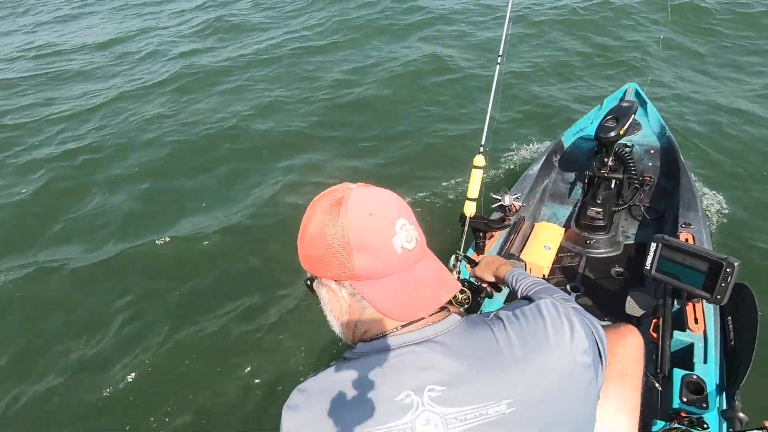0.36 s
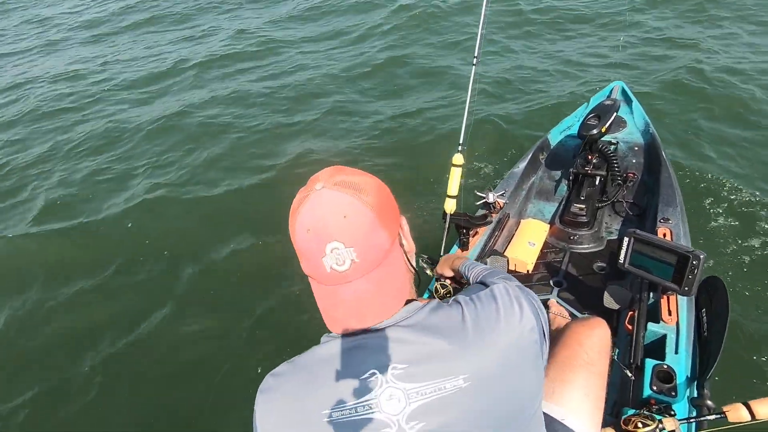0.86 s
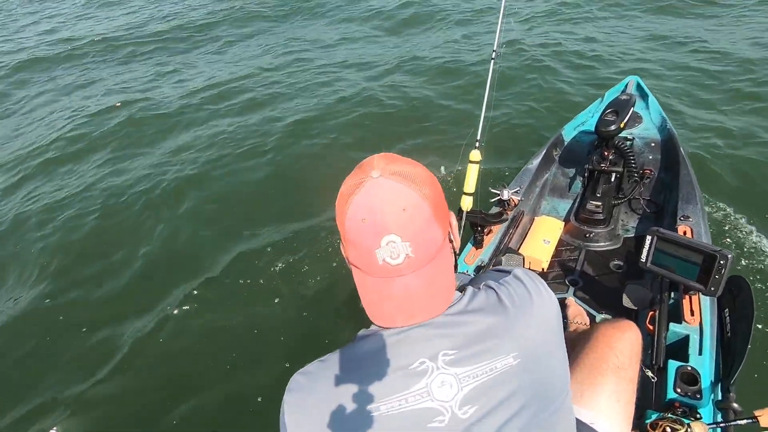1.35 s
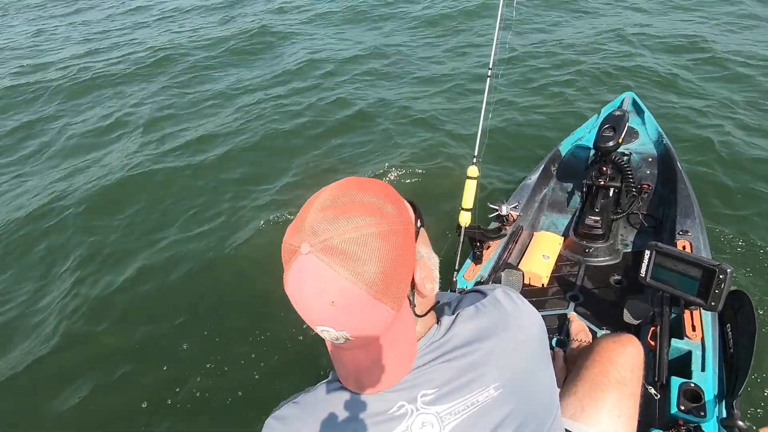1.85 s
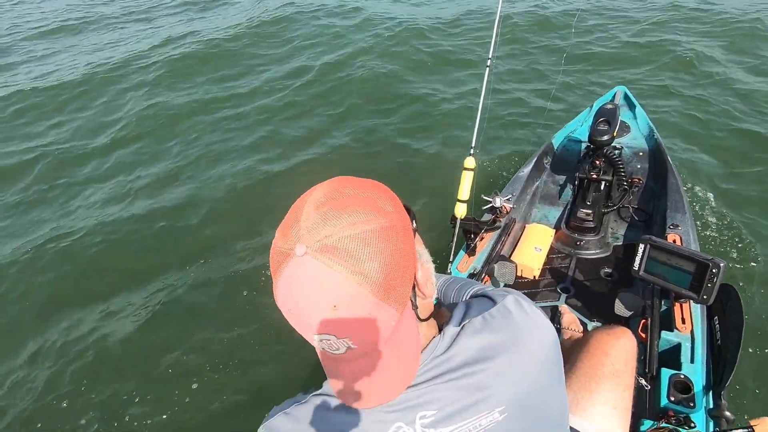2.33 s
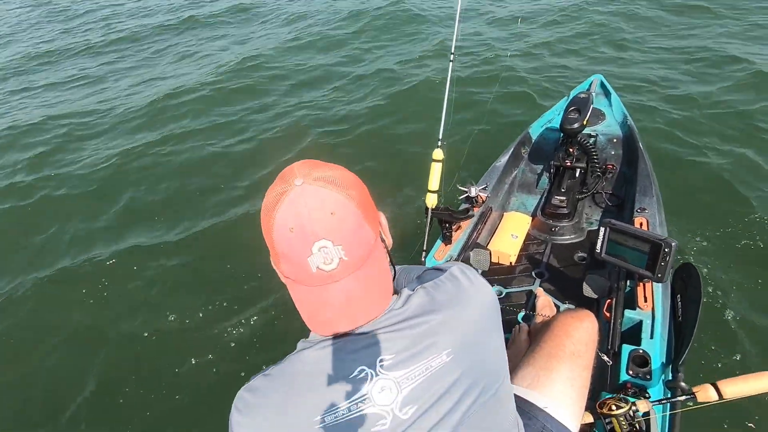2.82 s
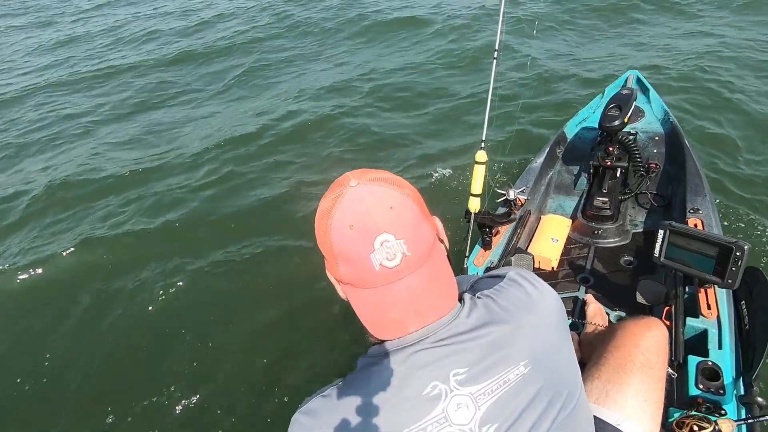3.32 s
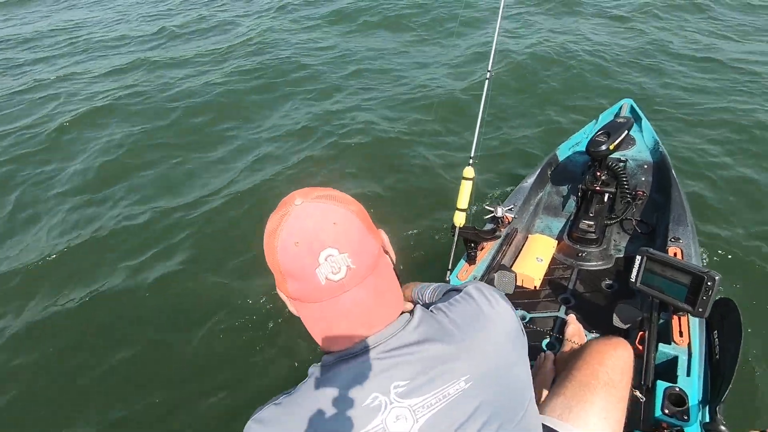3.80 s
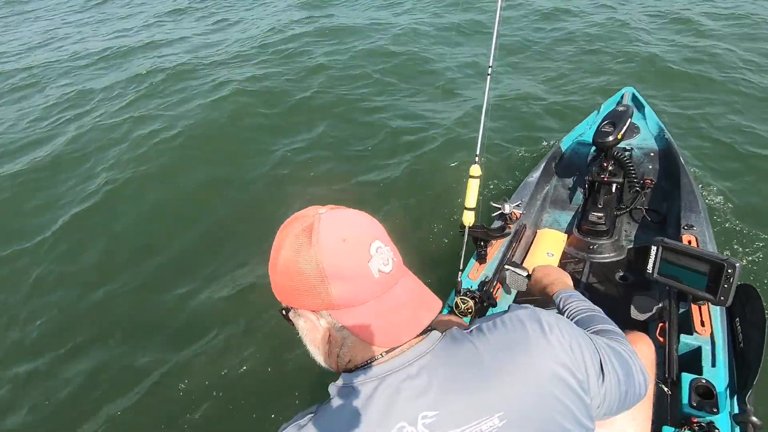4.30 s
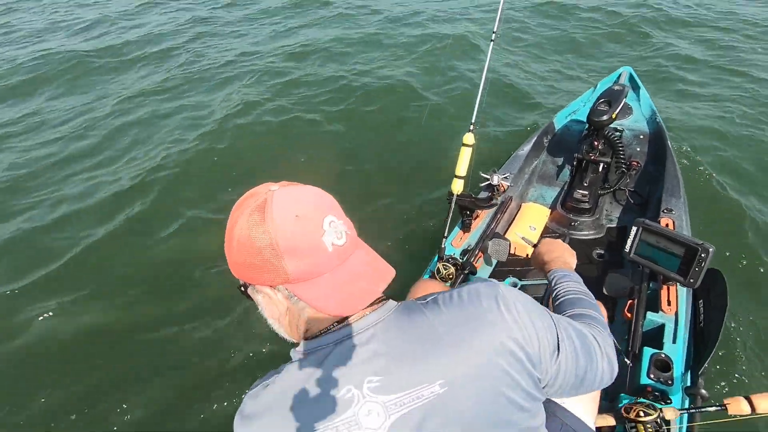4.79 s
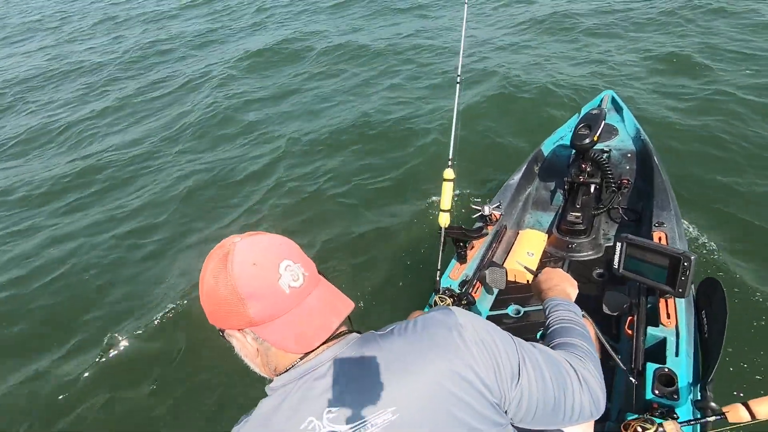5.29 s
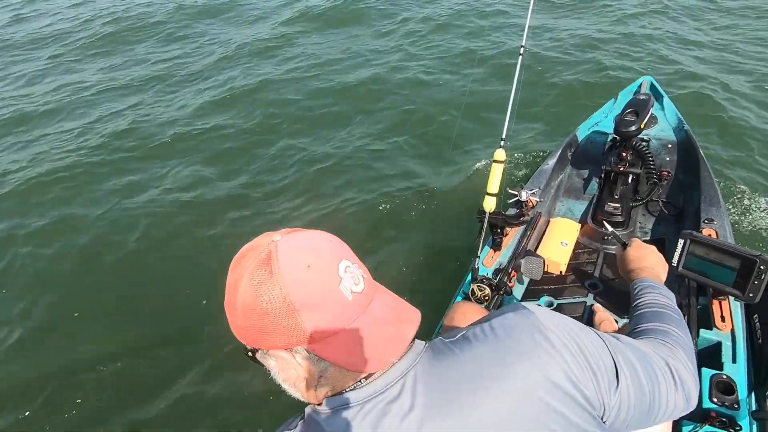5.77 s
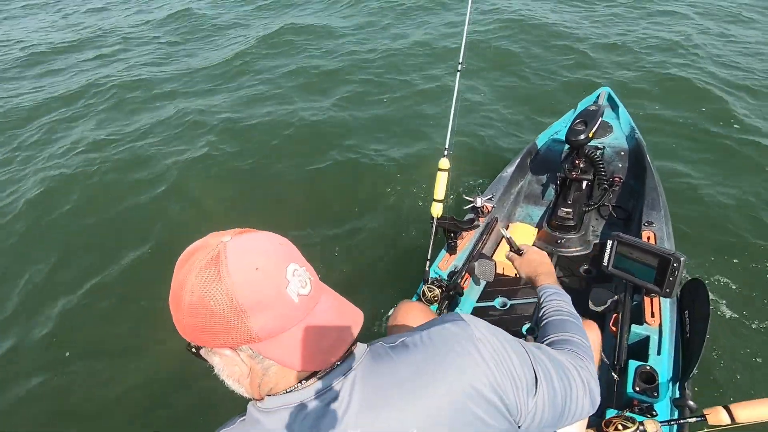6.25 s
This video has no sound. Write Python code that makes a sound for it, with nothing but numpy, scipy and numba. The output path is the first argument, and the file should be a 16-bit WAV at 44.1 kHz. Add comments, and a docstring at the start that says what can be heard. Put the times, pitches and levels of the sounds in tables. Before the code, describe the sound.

Close, bass-heavy two-channel sound from a kayak, with the low end stronger on the right. Soft wash and faint hiss continue under irregular hollow slaps, rising bubble plops, short gulps of air and dull panel thumps. Tiny droplets tick on the deck. A quieter lull sits in the middle, then more slaps and foam fizz, one light knock, and two booming slaps near the end.

```python
"""On the water in a plastic kayak, heard by a two-port camera microphone on a pole fixed to the boat.
From the start filtered noise gives wind, hull rumble and hiss, summed cosines a far engine, and beds of
tiny rings in noise the wash. Within half a second bubbles plop, air gulps and waves slap, some short and
dry (hull and pole carry the treble first); panels thump as low tones, droplets tick as noise bursts.
From about 3 s foam fizzes in slower bursts; gear knocks near 5 s; past 6 s two heavy waves boom in the hull."""
import sys
import numpy as np
from scipy import signal
from scipy.fft import rfft, irfft
from scipy.io import wavfile
from scipy.ndimage import uniform_filter1d
from numba import njit

SR = 44100
rng = np.random.default_rng(int(sys.argv[2]) if len(sys.argv) > 2 else 0)


def wav_record(signal):
    """Record a signal, one row per channel, as 16-bit PCM in the file named by sys.argv[1]."""
    frames = np.transpose(np.atleast_2d(signal))
    bounded = np.clip(frames, -1, 1)
    # unit amplitude maps onto the largest positive 16-bit level
    quanta = np.round(bounded * 32767).astype(np.int16)
    wavfile.write(sys.argv[1], SR, quanta)


def field_ratio(decibels):
    """Amplitude ratio for a level in dB (20 dB per decade); scalars and array-likes work."""
    return 10 ** (np.asarray(decibels, dtype=float) / 20)


N = 292383
T = np.arange(N) / SR
HZ = np.arange(N // 2 + 1) * SR / N + 1e-3  # kept above zero for logs and ratios

# Water colour at the two ports: f/Hz, left gain/dB, right gain/dB, left phase lead/rad
PORT_COLOUR = [(180, -3.5, 10.5, -3), (300, -7, -1.5, 3), (410, -3.5, 1.5, 1), (740, -6.5, -3.5, -2),
               (1140, -9.5, -3.5, 0), (1474, -3.5, 0, -4.5), (1900, -7, -3, -5.5), (2870, -28, -21.5, -4),
               (3000, -22, -28, -10.5), (4570, -27.5, -21, -11), (7160, -14, -21, -8.5),
               (10000, -36.5, -35, -8.5), (12200, -43, -47.5, -17), (15800, -57.5, -61.5, -15)]
# Pole and housing resonances: f/Hz, width/Hz, left gain/dB, right gain/dB
MOUNT_RESONANCES = [(284, 12, 0.5, 6), (792.4, 49, 13, 6), (847, 39, 7, 10), (900, 130, -10.5, -3.5),
                    (1235, 120, 6.5, 7.5), (3295, 310, 4.5, 9.5), (6030, 350, -0.5, 16)]
# Wind gusts before their random wander: t/s, level/dB
WIND_GUSTS = [(0.05, -34.5), (0.54, -41.5), (0.67, -22), (0.83, -45.5), (1.02, -34.5), (1.64, -45.5),
              (1.76, -22.5), (1.93, -40.5), (3.01, -38.5), (3.08, -57.5), (3.35, -21), (3.44, -26.5),
              (3.52, -31), (4.23, -27.5), (4.28, -40.5), (4.43, -26.5), (4.9, -25.5), (5.15, -28.5),
              (5.38, -25.5), (5.63, -38.5), (5.98, -21), (6.09, -25.5), (6.18, -21), (6.29, -30.5),
              (6.43, -26), (6.6, -32.5)]
# Hull rumble before stir and wander: t/s, level/dB
HULL_RUMBLE = [(0, -26), (.3, -24.5), (.6, -29), (1.3, -27.5), (1.7, -27.5), (2.1, -22), (2.7, -28.5),
               (3.4, -27), (3.8, -25), (4.3, -25.5), (4.8, -27), (5.2, -30), (5.7, -26), (6.1, -26),
               (6.6, -30.5)]
# Relative spectrum of the hull rumble: f/Hz, density/dB per Hz
HULL_COLOUR = [(29, -32.5), (50, -0.5), (103, -2.5), (140, -1), (175, -15.5), (226, -35), (300, -43),
               (390, -80.5), (660, -120)]
# Far engine as it carries over the water: t/s, level/dB
ENGINE_LEVEL = [(0, -27.5), (.5, -27.5), (1, -26.5), (1.9, -37), (2.4, -27.5), (3.4, -34.5), (4.1, -26.5),
                (4.6, -32), (5.3, -27.5), (5.8, -38.5), (6.6, -29)]
# Engine orders: multiple of firing rate, relative level/dB, share of level swings followed, own wander/dB
ORDERS = [(1, -4, 0.99, 4.5), (2, -8, 0.55, 3.5), (3, -2.5, 1.4, 1.5), (4, -3, 1.2, 2), (5, -9.5, .6, 2),
          (6, -11.5, 0.17, 2), (7, -25, 0.15, 3.5), (8, -32, 0.18, 2), (10, -42.5, 0.33, 1.5)]
# Relative spectrum of steady air and microphone hiss: f/Hz, density/dB per Hz
HISS_COLOUR = [(150, -13), (250, -7), (400, -19.5), (800, -19), (2000, -25.5), (3000, -44), (6000, -41.5),
               (10000, -45), (13000, -53.5), (16000, -66)]
# Water sloshing under the hull, before stir and wander: t/s, level/dB
SLOSH = [(0.05, -61), (0.16, -57), (0.43, -69), (1.38, -61), (1.49, -53.5), (1.64, -59.5), (2.27, -57.5),
         (2.66, -76.5), (3.22, -73), (3.46, -59), (3.99, -59), (4.15, -63), (4.46, -75.5), (4.98, -63.5),
         (5.27, -72.5), (6.16, -53.5), (6.32, -61.5), (6.6, -61.5)]
# Drive of the other water beds: t/s, wave action level/dB, spray level/dB
WAVES_AND_SPRAY = [(0.05, -65.5, -88.5), (0.41, -60, -76), (0.62, -64, -82), (0.89, -61.5, -83),
                   (1.05, -63.5, -83.5), (1.13, -55, -75.5), (1.22, -59, -76.5), (1.34, -58.5, -79),
                   (1.64, -56, -73.5), (1.82, -58.5, -81.5), (2.3, -65.5, -83.5), (2.64, -71, -85),
                   (2.95, -65.5, -80), (3.15, -62.5, -77), (3.31, -62, -80), (3.68, -59.5, -78.5),
                   (3.86, -55, -77.5), (4.15, -62, -78.5), (4.59, -58, -82.5), (4.85, -63.5, -83.5),
                   (5.09, -60.5, -79.5), (5.21, -69, -81.5), (5.26, -64, -75.5), (5.33, -61.5, -74.5),
                   (5.39, -60, -72), (5.45, -57, -71), (5.6, -58, -76.5), (5.85, -58.5, -78),
                   (5.98, -55.5, -73.5), (6.07, -48.5, -76), (6.15, -56, -76), (6.29, -59.5, -77),
                   (6.38, -58.5, -74), (6.48, -55, -72), (6.6, -57, -70)]
# Levels around which the beds swing: wave action level/dB, spray level/dB
CALM = (-56, -74)
# Slosh, lapping, trickle, spray: (band low and high f/Hz), (bubble low and high f/Hz), bubble count
WATER_BEDS = [((220, 680), (300, 700), 400), ((680, 2400), (700, 2400), 1200), ((2400, 4500), (2400, 4500),
              2500), ((4500, 12000), (4500, 9000), 4000)]
# Grain of those four beds: mean cycles, size spread/dB, noise over bubbles/dB, share unrelated between ports
BED_GRAIN = [(21, 3.5, 9, 0.49), (12, 3.5, 3.5, 0.44), (11, 6.5, 9, 0.32), (8.2, 6, 3, 0.16)]
# How lapping, trickle and spray follow: offset/dB, dB per dB of waves, dB per dB of spray, share of stir
BED_FOLLOW = [(3, 1.13, -0.11, 0.16), (-10.5, 0, 0.91, 0.12), (2, -0.25, 1.1, 0.16)]
# Single bubbles before the ports: t/s, level/dB, starting f/Hz, 60 dB decay/s
BUBBLE_EVENTS = [(.092, -43.5, 530, 0.11), (.155, -51, 754, 0.21), (0.187, -43.5, 445, 0.073),
                 (0.353, -33, 916, 0.055), (0.463, -40, 1273, 0.06), (.52, -52.5, 877, .09),
                 (.635, -47.5, 922, 0.11), (.695, -24, 740, .05), (0.698, -26.5, 1287, 0.044),
                 (0.774, -36, 1243, 0.036), (.963, -42.5, 1980, 0.045), (1.297, -34.5, 450, 0.091),
                 (1.35, -50, 833, 0.06), (1.421, -32.5, 1625, 0.035), (1.603, -42, 479, .08),
                 (1.641, -38.5, 471, 0.099), (1.08, -42, 783, .1), (1.114, -36.5, 1296, .05),
                 (1.606, -41.5, 856, 0.065), (1.68, -46.5, 798, 0.033), (1.766, -46, 1658, .04),
                 (1.832, -40, 847, .06), (1.83, -41, 1480, 0.043), (1.908, -51, 2020, .035),
                 (2.97, -48, 806, 0.07), (3.15, -47, 794, 0.081), (3.192, -38, 789, .07),
                 (3.286, -35, 817, .07), (4.345, -42.5, 1730, .03), (3.158, -40, 1583, 0.032),
                 (3.344, -40, 1682, .04), (3.372, -41, 1290, .05), (3.574, -47.5, 1223, 0.036),
                 (3.576, -41.5, 449, 0.16), (3.619, -39, 513, 0.12), (3.662, -48, 525, .1),
                 (3.887, -36, 883, 0.14), (3.887, -42, 466, 0.09), (4.069, -42.5, 458, 0.12),
                 (4.122, -38.5, 478, 0.063), (4.19, -45.5, 419, 0.05), (4.405, -33, 1790, 0.027),
                 (4.642, -45.5, 1250, 0.1), (5.835, -48, 1123, 0.057), (5.906, -32, 829, 0.041),
                 (0.907, -38, 1152, .04), (3.292, -30, 1273, 0.045), (5.034, -49, 2227, .04),
                 (6.063, -44.5, 1192, .05), (6.088, -38.5, 1230, .05), (6.106, -32.5, 1273, 0.072),
                 (6.188, -41.5, 1240, .05), (6.215, -34.5, 1683, 0.04), (6.254, -38.5, 523, 0.048),
                 (6.263, -43.5, 806, 0.05), (6.388, -40.5, 1257, .05), (1.315, -41.5, 1237, .04),
                 (2.036, -39.5, 847, 0.056)]
# Air gulped under the hull, before the ports: t/s, level/dB, starting f/Hz, length/s
GLUG_EVENTS = [(0.207, -37.5, 410, 0.039), (1.388, -39, 422, 0.067), (1.479, -40.5, 455, .04),
               (1.789, -44, 445, .07), (2.049, -32, 445, 0.034), (0.914, -32.5, 854, 0.014),
               (1.542, -42, 1015, .035), (6.257, -43, 1190, 0.02)]
# Wave slaps and knocks before the ports: t/s, level/dB, centre f/Hz, width/octaves
SLAP_EVENTS = [(.262, -42.5, 479, .4), (.281, -40.5, 1407, .4), (.283, -36.5, 517, 0.6),
               (.696, -26.5, 757, 0.35), (.722, -34, 678, .4), (0.964, -48.5, 1146, 0.48),
               (1.087, -46, 1273, 1.4), (1.109, -34.5, 918, 0.62), (1.24, -50, 923, 0.44),
               (1.34, -45, 900, .4), (1.52, -45, 820, 0.3), (1.135, -40, 650, .5), (1.18, -46, 706, 0.68),
               (1.5, -43, 1750, 0.32), (1.294, -37, 500, 0.65), (1.291, -46, 1192, .3),
               (1.619, -43.5, 508, .6), (1.869, -47, 1185, .5), (1.978, -48.5, 810, .3),
               (2.042, -39.5, 699, 0.45), (2.9, -54, 1750, .2), (2.17, -51.5, 801, .3),
               (2.366, -47.5, 1296, .9), (2.405, -51, 903, 0.42), (2.447, -48.5, 878, 0.78),
               (2.681, -58, 1175, 0.37), (2.949, -50.5, 1032, 0.39), (3.198, -43, 1397, .8),
               (3.248, -34, 889, 0.62), (3.288, -29, 816, 0.47), (3.42, -31, 928, 0.6),
               (3.45, -42.5, 1082, 0.51), (3.737, -36, 688, 0.3), (3.984, -48, 900, 0.74),
               (4.09, -45, 505, .5), (4.316, -46, 1090, 0.33), (4.365, -46.5, 539, 1.3),
               (4.611, -46.5, 1245, 0.87), (4.682, -52, 804, 0.96), (4.745, -52, 997, 0.32),
               (4.812, -48, 970, 0.31), (4.883, -43.5, 692, 0.58), (4.934, -42, 980, 0.41),
               (5.275, -50, 1150, .5), (5.299, -40.5, 1520, 0.64), (5.312, -42, 519, 0.88),
               (5.566, -50.5, 991, 0.37), (5.59, -34, 441, 0.55), (5.615, -37.5, 348, .5),
               (5.692, -44, 435, 0.65), (5.75, -51, 1100, 1.1), (5.983, -41, 785, 0.79),
               (6.018, -37, 1325, 0.54), (6.021, -28, 548, 0.8), (6.032, -32, 334.4, .4),
               (6.212, -39.5, 1385, .35), (6.249, -32, 527, 0.4), (6.283, -44, 410, .4),
               (6.39, -43.5, 1225, 0.44), (6.542, -28.5, 850, 0.38), (6.549, -24.5, 557, 0.45),
               (6.562, -33.5, 554, .3), (5.62, -39, 518, 0.64), (5.6, -46, 1100, 0.67),
               (5.52, -48.5, 1243, 0.44)]
# Short dry blows (brief slaps, low thuds, one gear knock) before the ports:
# t/s, level/dB, centre f/Hz, width/octaves
DRY_BLOWS = [(0.91, -42, 720, 0.57), (3.933, -44.5, 360, 0.58), (3.8, -45.5, 320, .5), (4.9, -43, 220, 0.3),
             (4.842, -42, 440, 0.57), (5.036, -37, 1100, 1), (5.0345, -37, 2200, 0.3), (.283, -39, 700, .9),
             (.712, -38, 380, .5), (6.057, -45.5, 1200, 1.0), (1.87, -50.5, 2100, .25)]
# Hull panel thumps before panel gain and ports: t/s, level/dB, length/s
PANEL_THUMPS = [(.298, -37, .03), (.805, -47, 0.014), (1.308, -45.5, 0.066), (1.585, -38.5, 0.051),
                (2.236, -50, 0.12), (3.245, -43, .06), (3.441, -44.5, 0.037), (3.931, -43.5, 0.017),
                (4.093, -44.5, 0.068), (4.188, -46.5, 0.016), (4.367, -37.5, 0.014), (4.839, -42.5, 0.02),
                (4.884, -45.5, 0.041), (5.312, -45, 0.015), (5.634, -37.5, 0.054), (6.021, -32.5, 0.044),
                (6.248, -48, 0.069), (6.541, -29.5, 0.038)]
# Droplet ticks before the ports: t/s, level/dB, centre f/Hz, width/octaves
DROPLETS = [(.402, -45.5, 5640, 0.17), (1.1608, -48, 5840, 0.28), (1.1906, -53, 5740, 0.31),
            (2.2106, -52.5, 5500, 0.9), (3.0213, -57, 5970, 0.26), (3.05, -47, 3330, 0.48),
            (3.157, -58, 4580, 0.13), (3.1935, -50, 4520, 0.18), (3.2054, -45.5, 6850, 0.31),
            (3.245, -53, 5640, 0.14), (3.245, -55.5, 3100, 0.56), (3.3916, -55, 3080, 1),
            (3.558, -53.5, 6800, .3), (3.5723, -51, 6040, 0.2), (3.665, -54, 3300, 0.069),
            (3.688, -48, 3880, 0.39), (3.712, -53, 4940, 0.23), (5.033, -50.5, 4450, 0.62),
            (5.3082, -52, 3070, 0.97), (5.4053, -51.5, 5680, 0.46), (5.438, -52.5, 6030, 0.22),
            (5.527, -47, 5940, 0.19), (5.56, -58, 6460, 0.57), (5.664, -57, 3090, 1),
            (5.963, -53.5, 2980, 0.83), (6.012, -49.5, 3570, .9), (6.028, -45.5, 3610, .9),
            (6.055, -54.5, 3620, 1), (6.315, -59, 3210, .93), (6.3787, -55, 6600, 0.18),
            (6.5, -55, 3070, 0.7), (6.5492, -53, 3065, 0.29)]
# Patches of foam fizzing out, before the ports: t/s, level/dB, centre f/Hz, width/octaves
FOAM = [(2.97, -64, 5960, 0.16), (3.1, -70, 5970, 0.18), (3.25, -61, 5700, 0.27), (3.38, -59, 6000, 0.33),
        (3.58, -54.5, 5200, .12), (3.63, -58.5, 5830, .1), (3.66, -56.5, 6430, 0.27),
        (5.37, -61, 4500, .25), (5.46, -61, 4400, .25), (5.65, -61, 5800, .2), (6.38, -60.5, 6500, .3)]
# Heaviest waves flexing the whole hull, before the port balance: t/s, level/dB, length/s
HULL_BOOMS = [(6.016, -8.5, 0.065), (6.546, -10.5, 0.08)]


def columns(table):
    """Draw each column as a curve over every sample."""
    s, *cols = np.transpose(table)
    return [np.interp(T, s, c) for c in cols]


def unit(x):
    """Scale to rms 1."""
    return x / np.sqrt(np.mean(x ** 2))


def band(x, lo_hz, hi_hz, order=4):
    """Zero-phase band-pass."""
    low_side = 1 + (lo_hz / HZ) ** (2 * order)
    high_side = 1 + (HZ / hi_hz) ** (2 * order)
    return irfft(rfft(x) / np.sqrt(low_side * high_side), N)


def coloured(noise, hz, db, **ends):
    """Shape noise by a spectrum drawn over log frequency."""
    colour = field_ratio(np.interp(np.log(HZ), np.log(hz), db, **ends))
    return irfft(rfft(noise) * colour, N)


def walk(rate):
    """Slow random wander of rms 1; rate is random steps a second."""
    k = int(SR / rate)
    steps = np.repeat(rng.standard_normal(N // k + 1), k)
    return unit(uniform_filter1d(uniform_filter1d(steps, k), k)[:N])


def add(out, s, x):
    """Mix a short sound in at time s."""
    i = int(s * SR)
    out[i:i + len(x)] += x[:N - i]


def octave_bell(f, hz, octaves):
    """Spectrum bell-shaped over octaves."""
    return np.exp(-.5 * (np.log2(f / hz) / octaves) ** 2)


def water_colour(port):
    """Response of one port with the pole and housing resonances on top."""
    hz, *cols = np.transpose(PORT_COLOUR)
    gain = field_ratio(np.interp(np.log(HZ), np.log(hz), cols[port]))
    gain = gain * np.exp((1 - port) * 1j * np.interp(HZ, hz, cols[2]))  # phase lead on the left only
    for f, width, *db in MOUNT_RESONANCES:
        gain = gain * (1 + (field_ratio(db[port]) - 1) / (1 + 1j * (HZ ** 2 - f ** 2) / (HZ * width)))
    return gain


def ports(x, other=0, share=0):
    """Bring one sound to both ports; a share of the left one's power is unrelated."""
    left = np.sqrt(1 - share) * x + np.sqrt(share) * other
    return np.array([irfft(rfft(v) * water_colour(k), N) for k, v in enumerate((left, x))])


def flatten(hz):
    """Gain that undoes the right port's colour at hz, mount resonances aside."""
    port_hz, _, right_db, _ = np.transpose(PORT_COLOUR)
    return field_ratio(-np.interp(np.log(hz), np.log(port_hz), right_db))


def stir():
    """Churn in dB that builds before each slap and settles after it."""
    stir_db, rise_s, fall_s = -45, 0.0087, 0.08  # slaps above stir_db churn the water most
    s, db = np.transpose(SLAP_EVENTS)[:2]
    late = T[::64] - s[:, None]
    swell = field_ratio(db - stir_db)[:, None] * np.exp(np.where(late > 0, -late / fall_s, late / rise_s))
    return np.repeat(20 * np.log10(1 + swell.sum(axis=0)), 64)[:N]


def rumble():
    """Low noise: wind buffets each port partly alone, hull rumble reaches both nearly alike."""
    wind_db = columns(WIND_GUSTS)[0] + 2.5 * walk(9)
    hull_db = columns(HULL_RUMBLE)[0] + 0.1 * stir() + 2 * walk(8)
    hz, db = np.transpose(HULL_COLOUR)
    # the first noise is common, the other two belong to one port each
    hull = [unit(coloured(rng.standard_normal(N), hz, db)) for _ in range(3)]
    wind = [unit(band(rng.standard_normal(N), 23, 29, order=3)) for _ in range(3)]
    hull_ports = field_ratio(hull_db) * (hull[0] + 0.066 * np.array(hull[1:]))
    wind_ports = field_ratio(wind_db) * (wind[0] + .5 * np.array(wind[1:]))
    return hull_ports + wind_ports


def engine():
    """Far engine as multiples of its firing rate, nearly in step so the firings throb."""
    firing_hz, drift, slip_rad = 27.4, .003, .55
    phase = 2 * np.pi * np.cumsum(firing_hz * (1 + drift * walk(1.497))) / SR
    level_db = columns(ENGINE_LEVEL)[0]
    mean_db = level_db.mean()
    out = np.zeros(N)
    for k, db, share, wander_db in ORDERS:
        # the low orders swing most as they carry over the water
        order_db = mean_db + db + share * (level_db - mean_db) + wander_db * walk(2.548)
        out += np.sqrt(2) * field_ratio(order_db) * np.cos(k * phase + slip_rad * walk(3.2))
    return out


def hiss():
    """Steady air and microphone noise, unrelated at each port."""
    hz, db = np.transpose(HISS_COLOUR)
    return field_ratio(-62.5) * unit(coloured(rng.standard_normal((2, N)), hz, db, left=-90))


@njit
def grains(start, hz, cycles, size, glide, rise, n, sr):
    """Rings that swell, fade, and climb in pitch as the air pocket nears the surface."""
    out = np.zeros(n)
    for k in range(len(start)):
        span = int(cycles[k] * sr / hz[k]) + 2
        phase = 0.
        for i in range(min(span, n - start[k])):
            phase += 2 * np.pi * hz[k] * (1 + glide * i / span) / sr
            swell = min(i / (rise * span), 1.)
            out[start[k] + i] += size[k] * swell * np.exp(-6.9 * i / span) * np.sin(phase)
    return out


def gurgle(lo_hz, hi_hz, cycles, spread_db, noise_db, count):
    """Random bubbles of uneven size over a bed of noise."""
    when, pitch, ring, size = rng.random((count, 4)).T
    hz = lo_hz * (hi_hz / lo_hz) ** pitch
    sizes = field_ratio(-spread_db * np.log(1 - .93 * size))
    start = (when * N).astype(np.int64)
    pops = grains(start, hz, cycles * (.5 + ring), sizes, .15, 0.32, N, 1. * SR)
    return unit(unit(pops) + field_ratio(noise_db) * rng.standard_normal(N))


def wash():
    """Slosh, lapping, trickle and spray: bubble beds that follow waves, spray and slaps, under one surge."""
    out, surge, stir_db = 0, walk(14), stir()
    waves_db, spray_db = (db - calm for db, calm in zip(columns(WAVES_AND_SPRAY), CALM))
    levels = [columns(SLOSH)[0] + 0.14 * stir_db]
    # lapping and trickle rest on the wave calm, spray on its own
    for (offset_db, waves, spray, churn), calm in zip(BED_FOLLOW, np.repeat(CALM, (2, 1))):
        levels.append(calm + offset_db + waves * waves_db + spray * spray_db + churn * stir_db)
    for db, (hz, pitch, count), (*grain, share) in zip(levels, WATER_BEDS, BED_GRAIN):
        beds = [band(gurgle(*pitch, *grain, count), *hz) for _ in range(2)]
        out = out + field_ratio(db + 1.1 * surge + 2 * walk(22)) * unit(ports(*beds, share=share))
    return out


def bubbles():
    """Single air pockets ring down while their pitch climbs."""
    s, db, hz, t60 = np.transpose(BUBBLE_EVENTS)
    start = (s * SR).astype(np.int64)
    return grains(start, hz, hz * t60, field_ratio(db) * flatten(hz), 0.098, 0.067, N, 1. * SR)


def glugs():
    """Gulped air: a tone that swells as the pocket forms and stops as it breaks."""
    lean, glide = 0.51, 0.055  # crest before the middle; share by which the pitch climbs
    out = np.zeros(N)
    for s, db, hz, length in GLUG_EVENTS:
        u = np.arange(int(length * SR)) / (length * SR)
        tone = np.sin(2 * np.pi * hz * length * u * (1 + glide * u / 2))
        add(out, s, field_ratio(db) * flatten(hz) * np.sin(np.pi * u ** lean) * tone)
    return out


def impacts(table, t60_s, travel_s, blow_db, tail_db):
    """A ringing blow and a noise tail; bending waves bring the treble first and the bass later."""
    out, size, lead = np.zeros(N), 16384, 512
    t, f = np.arange(size) / SR, np.arange(size // 2 + 1) * SR / size + 1
    for s, db, hz, octaves in table:
        # wave speed grows with the root of frequency; 1.503 times the centre arrives on time
        delay = 2 * np.sqrt(1000 * f) - f * np.sqrt(1000 / (1.503 * hz))
        shape = octave_bell(f, hz, octaves) * np.exp(-2j * np.pi * travel_s * delay)
        blow = irfft(shape * (1 + 0.98 / (1 + 10j * (f / hz - hz / f))), size)
        rise = .008 / (1 + field_ratio(db + 42)) + 0.001998  # s; harder blows break faster
        decay = field_ratio(-60 * t / (t60_s * (1000 / hz) ** 0.73))
        noise = rng.standard_normal(size) * decay * np.minimum(t / rise, 1) ** 2
        # every tail has its own lumpy colour
        lumps = field_ratio(2.8 * unit(uniform_filter1d(rng.standard_normal(len(f)), size=30)))
        tail = irfft(shape * lumps * rfft(noise), size)
        # the tail starts early, so that its rise ends with the blow
        sound = field_ratio(blow_db) * np.roll(blow, lead) / np.abs(blow).max()
        sound += field_ratio(tail_db) * np.roll(tail, lead - int(rise * SR)) / np.abs(tail).max()
        add(out, s - lead / SR, field_ratio(db) * flatten(hz) * sound)
    return out


def slaps():
    """Waves hit the hull: a blow, the ring of the air it traps and a splash, carried along hull and pole."""
    # t60 at 1 kHz; travel is a 1 kHz bending wave's time from hull to camera
    return impacts(SLAP_EVENTS, t60_s=0.11, travel_s=.01, blow_db=0.5, tail_db=-1.5)


def dry_blows():
    """Brief slaps, low thuds and one gear knock: a stronger blow, a shorter and weaker tail."""
    return impacts(DRY_BLOWS, t60_s=0.037, travel_s=.003, blow_db=3, tail_db=-5)


def thumps(table, hz, lean):
    """Hull panels swell into a few low cycles and stop; lean under 1 puts the crest early."""
    out = np.zeros(N)
    for (s, db, length), u in zip(table, rng.standard_normal(len(table))):
        t = np.arange(int(length * SR)) / SR
        swell = np.sin(np.pi * (t / length) ** lean) ** 2
        tone = np.sin(2 * np.pi * hz * (1 + 0.033 * u) * t)  # each thump a little off pitch
        add(out, s, field_ratio(db) * swell * tone)
    return out


def bursts(table, t60_s, rise_s):
    """Band-shaped noise that rises quickly and dies away."""
    out, size = np.zeros(N), 8192
    t, f = np.arange(size) / SR, np.arange(size // 2 + 1) * SR / size + 1
    for s, db, hz, octaves in table:
        noise = irfft(rfft(rng.standard_normal(size)) * octave_bell(f, hz, octaves), size)
        envelope = field_ratio(-60 * t / t60_s) * np.minimum(t / rise_s, 1)
        add(out, s, field_ratio(db) * flatten(hz) * .5 * unit(noise) * envelope)
    return out


def droplets():
    """Droplets tick on the deck as brief bright bursts."""
    return bursts(DROPLETS, t60_s=.022, rise_s=0.0019)


def foam():
    """Foam fizzes out on the deck as slower bright bursts."""
    return bursts(FOAM, t60_s=0.16, rise_s=.02)


def booms():
    """The heaviest waves flex the whole hull at its low pitch."""
    return thumps(HULL_BOOMS, 128, 0.55)


def scene():
    """Bass reaches the right port louder; water sounds take the path through hull and pole."""
    cockpit_floor = field_ratio(7.5) * thumps(PANEL_THUMPS, 186, 0.45)
    side_panel = thumps(PANEL_THUMPS, 274, 0.82)
    port_balance = field_ratio(np.array([[-2.5], [2.1]]))  # left, right
    bass = (rumble() + engine() + cockpit_floor + booms()) * port_balance
    close = bubbles() + glugs() + slaps() + dry_blows() + side_panel + droplets() + foam()
    return bass + hiss() + wash() + ports(close)


def low_pass(x):
    """Removes everything above the highest recorded frequency."""
    return signal.sosfilt(signal.butter(12, 15655, fs=SR, output="sos"), x)


def record(dry):
    """Take the finished two-port mix into the camera."""
    return low_pass(dry)


dry = scene()
out = record(dry)
wav_record(out)
```